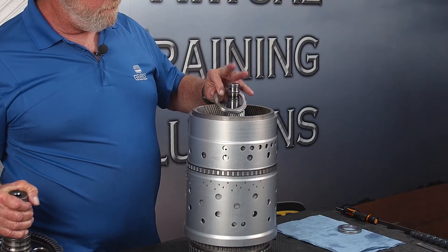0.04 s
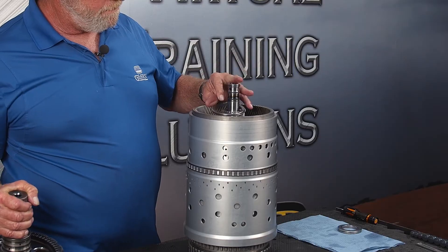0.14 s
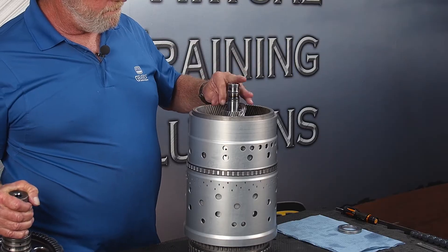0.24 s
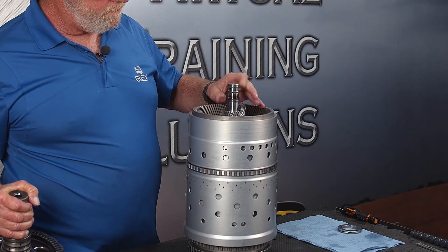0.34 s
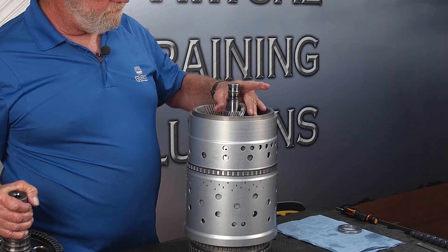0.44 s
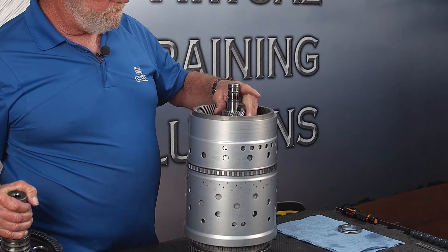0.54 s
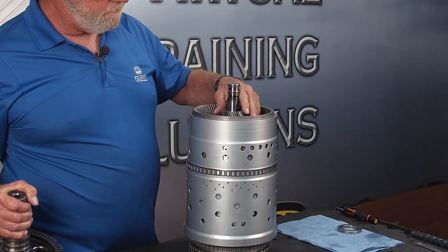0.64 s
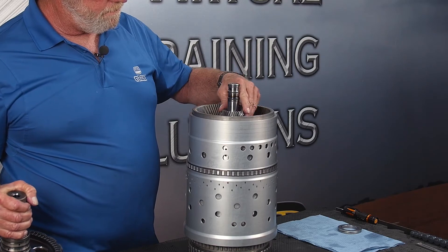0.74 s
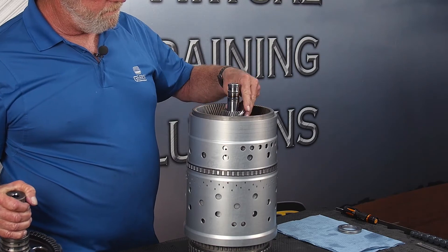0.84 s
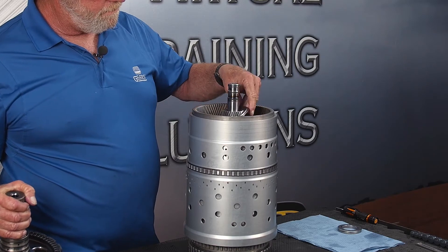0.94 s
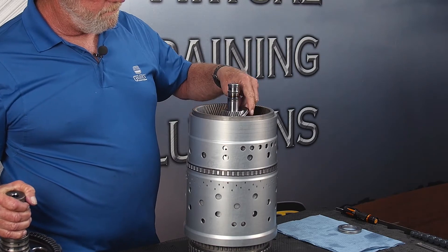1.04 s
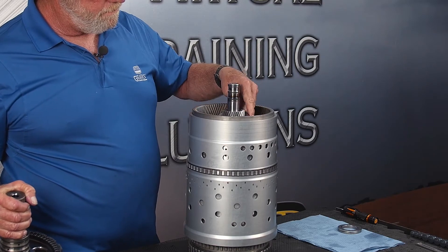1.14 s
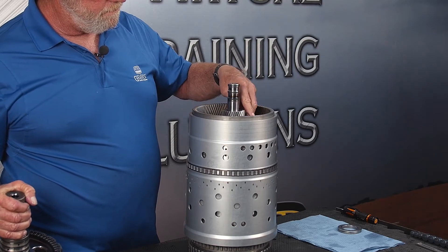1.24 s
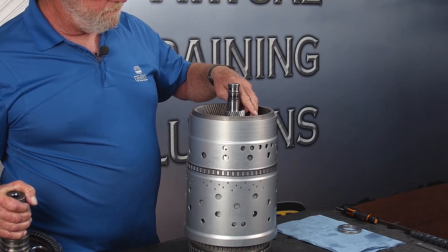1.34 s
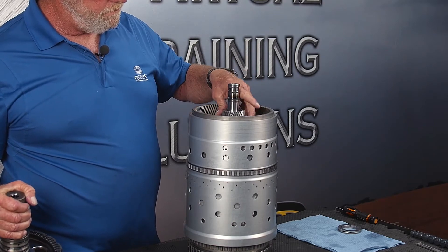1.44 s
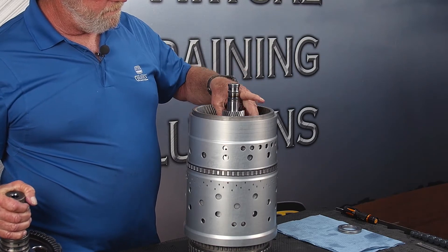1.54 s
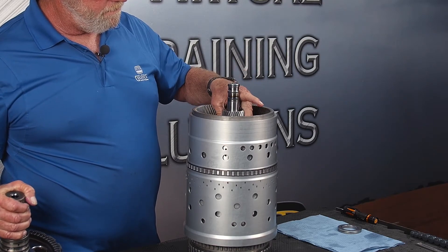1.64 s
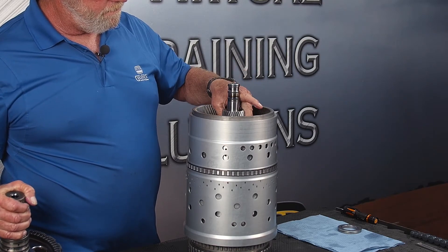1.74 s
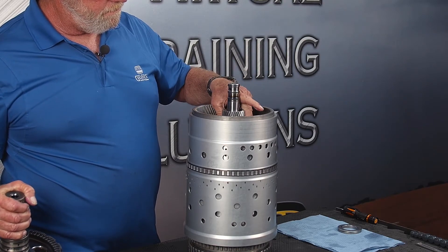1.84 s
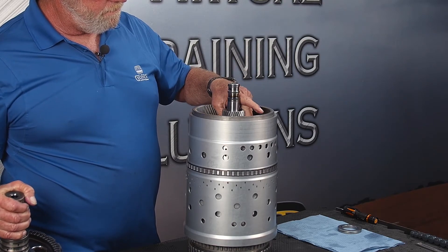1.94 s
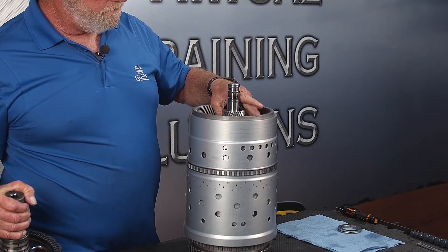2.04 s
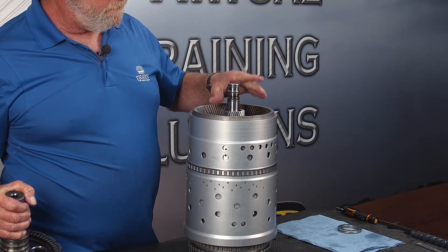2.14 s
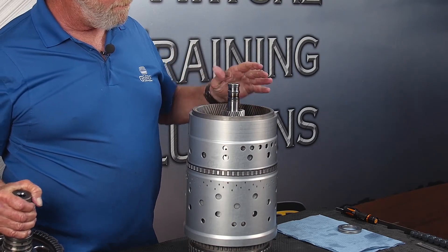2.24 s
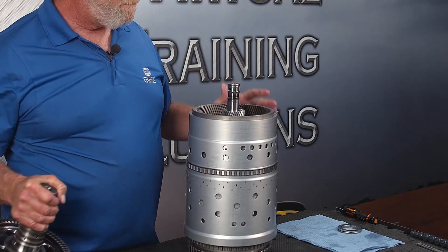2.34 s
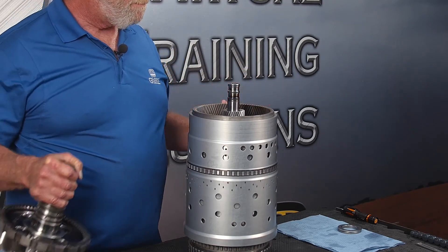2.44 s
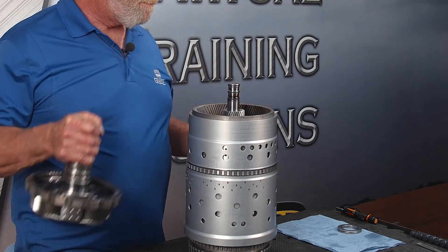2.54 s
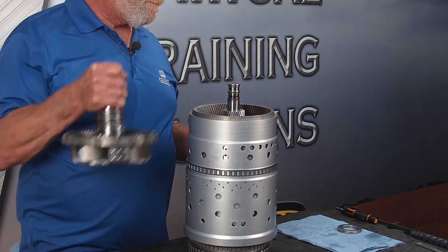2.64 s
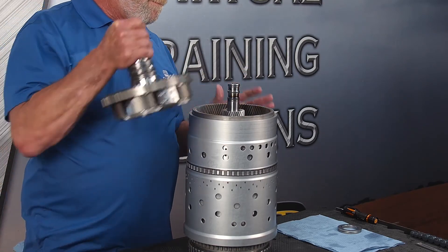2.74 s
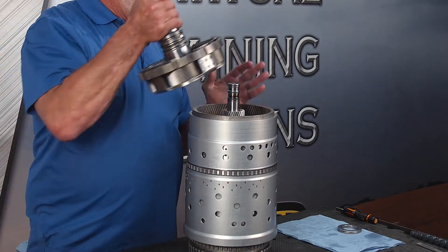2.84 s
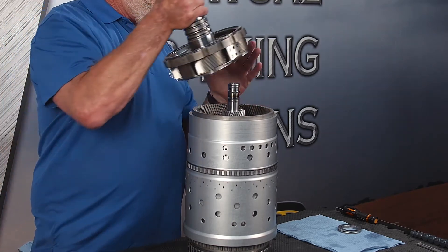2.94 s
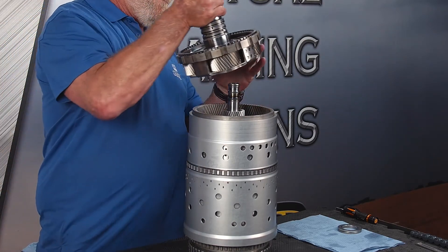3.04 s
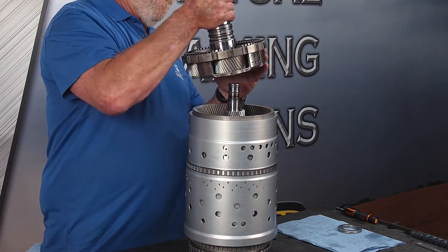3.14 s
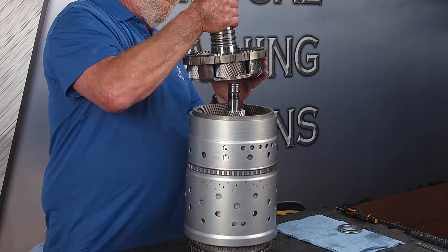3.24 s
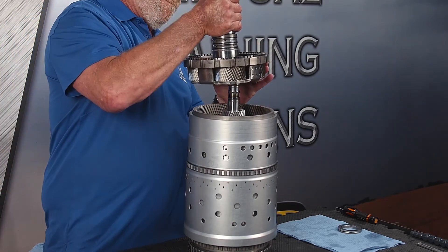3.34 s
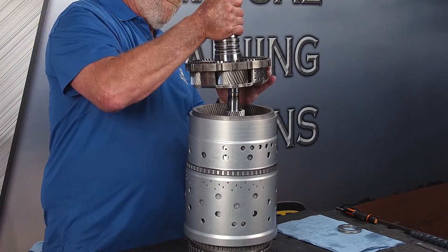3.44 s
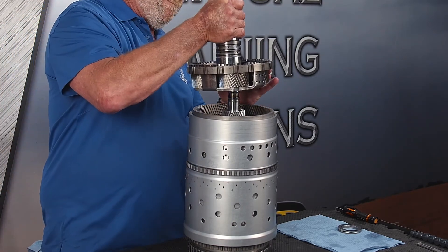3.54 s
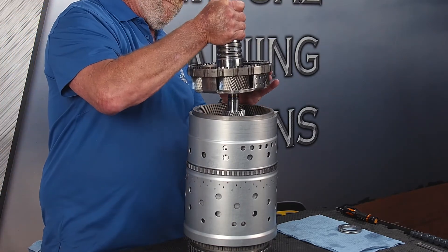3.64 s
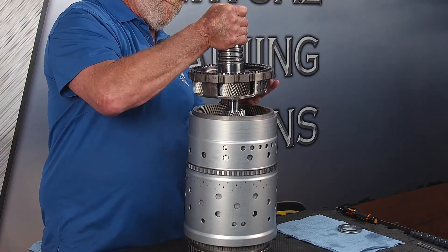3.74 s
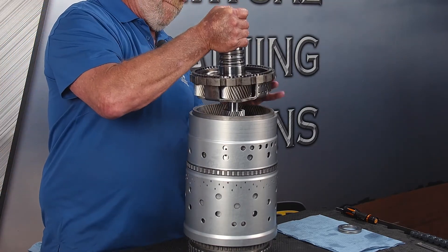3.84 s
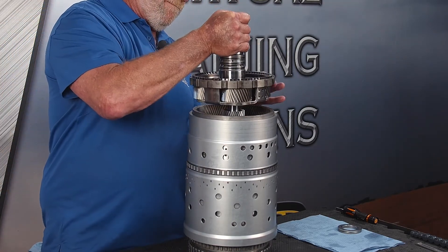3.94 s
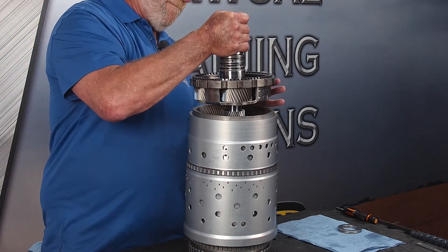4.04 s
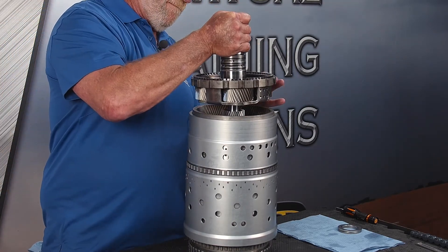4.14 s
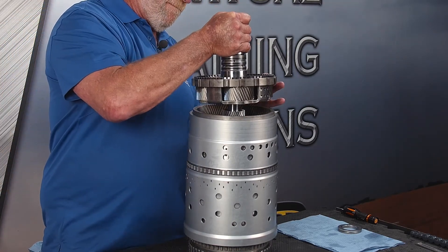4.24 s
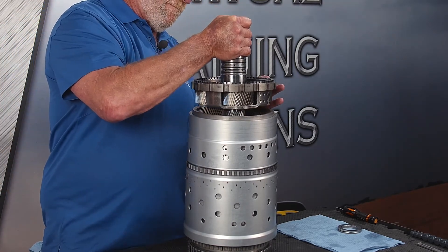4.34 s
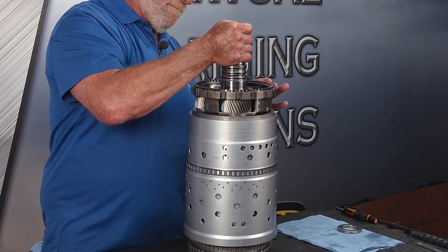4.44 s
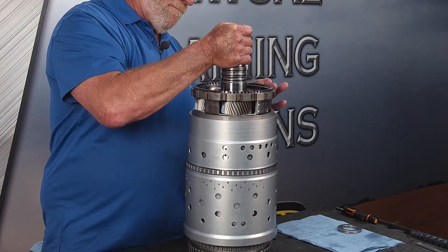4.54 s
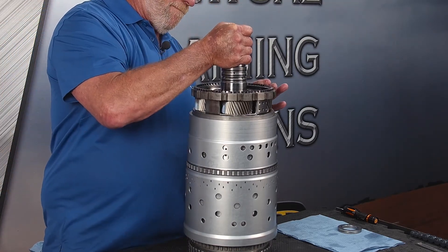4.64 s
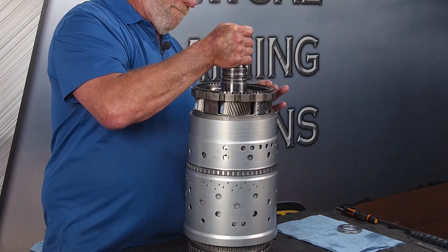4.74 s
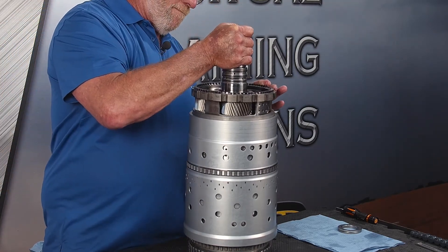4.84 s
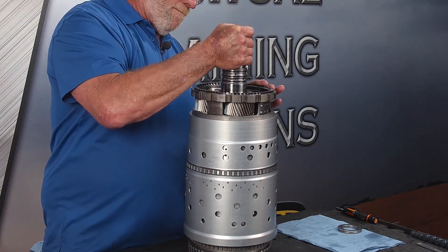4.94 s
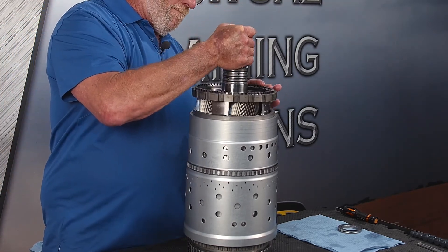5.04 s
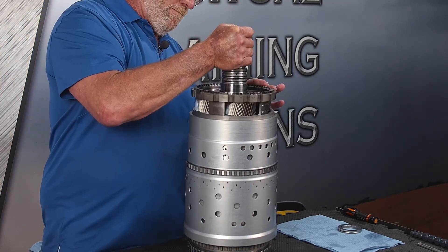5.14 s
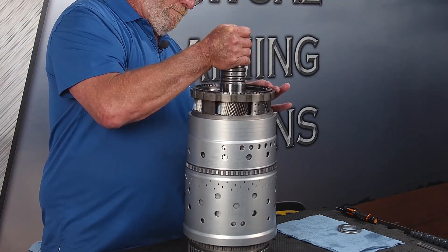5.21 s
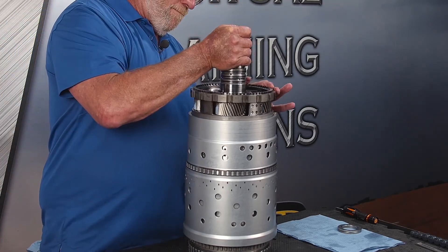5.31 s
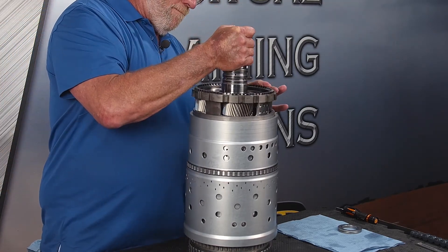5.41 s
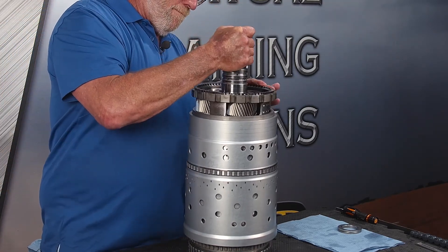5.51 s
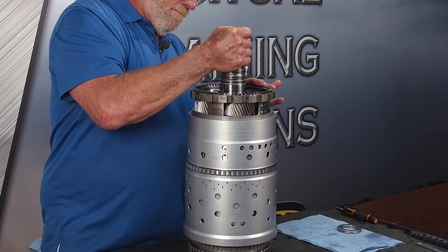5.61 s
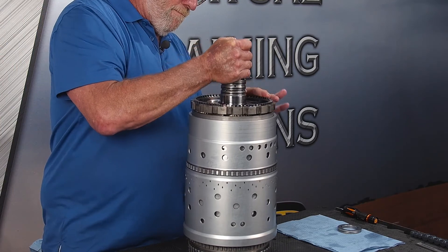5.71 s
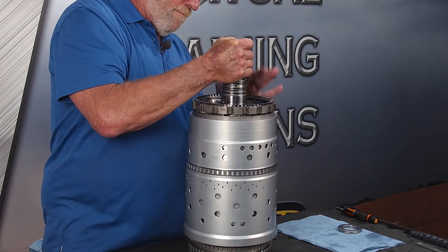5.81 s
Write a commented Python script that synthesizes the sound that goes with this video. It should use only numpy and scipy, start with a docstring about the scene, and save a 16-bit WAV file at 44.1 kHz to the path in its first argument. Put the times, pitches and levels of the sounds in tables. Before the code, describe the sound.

A thin steel washer ticks and scrapes down a shaft, cloth rustles, then a heavy gear carrier knocks, grinds and drops home with a loud clunk.

```python
"""Fitting gearbox parts

Steel gearbox parts go into an upright drum stack on a workshop bench, heard by a lapel microphone.
A thin washer ticks and slides down the shaft: blows and rough friction set noise bands and notes ringing.
A shirt rustles (shaped noise and a gliding whistle) as a heavy gear carrier is lifted over. It knocks
on the shaft, then its teeth rattle and grind into the ring gear until it drops home.
Air, hum and a low rocking lie below; noise that dies away makes the room."""
import sys
import numpy as np
from scipy import signal
from scipy.fft import rfft, irfft
from scipy.io import wavfile

SR = 44100
rng = np.random.default_rng(int(sys.argv[2]) if len(sys.argv) > 2 else 0)


def bounce(signal):
    """Save signal as a 16-bit WAV file at the path given by the first command-line argument."""
    frames = np.transpose(np.atleast_2d(signal))
    limited = np.clip(frames, -1, 1)
    pcm = np.round(limited * 32767).astype(np.int16)
    wavfile.write(sys.argv[1], SR, pcm)


N = 258867

# Levels of blows, notes and bands add up in dB, so each is a strength and not the final loudness.
# Air: (frequency [Hz], level [dB per Hz]), and its overall level [dB]
AIR = [(21, -33), (35, -4), (54, -10), (241, -20), (312, -29.5), (364, -20.5), (425, -39), (472, -28.5),
       (2330, -42), (12100, -46), (16500, -52)]
AIR_DB = -67.5
# Hum of the building: (frequency [Hz], average level [dB])
HUM = [(27, -64.5), (118.4, -84.5), (242, -79.5), (361, -87.5)]

# Small bright ticks: mostly the washer touching shaft and hub, the last two small contacts during
# the carrier's lift: (time [s], strength [dB], hollow part [dB], bright part [dB])
TICKS = [(0.001, -30.5, -10, 0), (0.048, -26, -14, -2), (0.1068, -26.5, -12, -1.5), (0.126, -19, -5.5, -1),
         (0.173, -31.5, -1.5, -3), (0.2188, -36, -3.5, -13.5), (0.2486, -32, -3, -5.5),
         (0.2575, -19.5, -3, 2), (0.271, -38, -0.5, 1), (0.2897, -39, 5, 5.5), (0.307, -47, 0, 5),
         (0.3132, -19, -10.5, -0.5), (0.3392, -40.5, 6.5, 4.5), (0.3648, -44.5, 1, 3),
         (0.378, -42.5, 1, -16), (0.642, -63.5, 0.5, 7), (0.7153, -55, 8, -9), (0.826, -62, -3.5, 1),
         (0.9224, -65, 19, 3), (0.934, -53, 1.5, -2), (0.9522, -39, -6, -12.5), (0.9675, -53, 19.5, -21),
         (1.0141, -40.5, 2, -7), (1.043, -53, 13.5, 8.5), (1.083, -63, 6, -8), (1.142, -52, 2, -9),
         (1.1924, -40, -7, 0), (1.202, -31, -7, 3.5), (1.2427, -38, -18, -32), (1.306, -37, -8, -4),
         (1.3632, -28.5, -25, -21), (1.422, -19.5, -10.5, 1.5), (1.4798, -28, -26, -19),
         (1.4853, -41, -23, 13.5), (1.5172, -38, -30, -25), (1.6873, -38, -10.5, -9),
         (2.0699, -51, -27, -35), (3.3438, -54, -14, -13), (3.3664, -44, -24, -17)]
# Washer scraping along the shaft: (start [s], full [s], fading [s], end [s], level [dB])
# In a few rows here and in SHIRT the times are out of order: those strokes are cut short or jump.
WASHER_SLIDE = [(0.0, .02, 0.14, 0.21, -61.5), (.1, .13, 0.2, 0.23, -57.5), (.24, .27, 0.32, 0.5, -57),
                (.88, .93, 0.97, 1.18, -66), (1.13, 1.19, 1.24, 1.3, -64), (1.27, 1.3, 1.34, 1.5, -63),
                (1.41, 1.43, 1.36, 1.9, -68), (1.64, 1.68, 1.83, 1.67, -66)]
# Long notes of the ticks: (frequency [Hz], level [dB], time to fall 60 dB [s])
TICK_MODES = [(702, -16, 0.045), (1360, -11, 0.07), (3160, -19, .04)]
# Crowded, quickly damped modes of the ticks: (frequency [Hz], level per band [dB], time to fall 60 dB [s])
TICK_CLACK = [(437.7, -14.5, 0.017), (880, 8.5, 0.0032), (1247, 5, 0.041), (2230, -14, 0.019),
              (2660, 1.5, 0.021), (5156, 1, 0.005), (6476, -1, 0.014), (7240, -2.5, 0.0084),
              (8660, 3, 0.02), (15170, -9.5, 0.0079)]
# Hiss of the slide: (frequency [Hz], level [dB per Hz])
SCRAPE = [(1180, -33), (2000, -1), (2170, -11), (2410, -4), (3210, -1.5), (4060, -15.5), (5270, 6),
          (6050, -7), (9240, -10), (14000, -19)]
SCRAPE_DB = -1  # compared with the slide
# Ringing of a -32 dB tick [dB]; softer ticks ring relatively more [dB per dB]
TICK_RING_DB, TICK_RING_SLOPE = -7, -0.061
# Rim singing under a rough, grainy slide: (time [s], level [dB])
RIM_STROKE = [(.46, -72), (.52, -62.5), (.6, -74.5), (.66, -91), (.75, -88), (.8, -77), (.83, -82.5)]
# Notes of the rim: (frequency [Hz], level [dB])
RIM_NOTES = [(3150, -3), (4440, -19.5)]
# Hub singing under a rough, grainy slide: (time [s], level [dB])
HUB_STROKE = [(1.305, -48.5), (1.4, -69), (1.49, -44), (1.64, -98)]
# Notes of the hub: (frequency [Hz], level [dB])
HUB_NOTES = [(1350, 0.5), (1700, -2), (5200, -13)]

# Single dying notes of the metal: faint pings, and the strong low notes of the carrier dropping home:
# (time [s], frequency [Hz], level [dB], time to fall 60 dB [s])
SINGLE_NOTES = [(0.0507, 4750, -50, 0.12), (.316, 3120, -46.5, 0.19), (1.366, 3230, -35, 0.028),
                (4.756, 10920, -57.5, .012), (4.784, 3200, -50, 0.0066), (4.901, 5760, -59, 0.026),
                (5.025, 11500, -53, .008), (5.039, 8500, -49, 0.0074), (5.074, 8600, -57, .008),
                (5.7912, 6375, -14.5, 0.023), (5.791, 2930, -15.5, 0.038), (5.8088, 1765, -0.5, 0.032)]
SWELL_S = 0.0011  # time constant of the rise of a note

# Shirt strokes against the microphone:
# (start [s], full [s], fading [s], end [s], dull rub level [dB], swish level [dB])
SHIRT = [(2.2, 2.29, 2.32, 2.96, -63.5, -72.5), (2.72, 2.89, 2.9, 3.66, -61, -63),
         (3.08, 3.18, 3.1, 3.36, -65.5, -77), (3.35, 3.39, 3.84, 3.344, -51, -89)]
STROKE_DEPTH_DB = 23  # a stroke rises by this much and falls again
# Dull rub of the cloth: (frequency [Hz], level [dB per Hz])
RUB = [(59, -30.5), (100, 2.5), (257, -7), (350, 6.5), (600, -9), (845, -6), (1000, -13), (2500, -38),
       (3250, -62.5), (5500, -120)]
# Swish of the cloth: (frequency [Hz], level [dB per Hz])
SWISH = [(880, -2.5), (1500, -5), (2560, -11.5), (3700, -10.5), (4270, -9.5), (14900, -24), (16000, -28.5)]
# Knit weave singing with the speed of the sleeve: (time [s], frequency [Hz])
WEAVE = [(2.8, 9700), (2.91, 15600), (2.96, 13800), (3.0, 15200), (3.05, 13600), (3.09, 11300),
         (3.17, 10400)]
WEAVE_DB = -89
# Cloth bumping the microphone: (time [s], peak level [dB])
BUMPS = [(3.229, -39), (3.238, -47)]

# Loose pinions whispering while the carrier is swung over: (time [s], level [dB])
PINION_STROKE = [(2.82, -79), (2.9, -74), (3.02, -65), (3.12, -89)]
# Notes of the pinions: (frequency [Hz], level [dB])
PINION_NOTES = [(845, 5.5), (2960, -6), (3870, -9), (4270, -1)]

# Carrier bumping and knocking: (time [s], strength [dB], thud part [dB], bright part [dB])
KNOCKS = [(3.015, -42.5, -4.5, -16), (3.597, -17.5, -12, -2.5), (3.662, -45, 5, 4),
          (3.749, -38.5, -30, -12.5), (4.053, -7, -10.5, -21.5), (4.408, -51, -7.5, -18.5),
          (4.588, -32.5, -2.5, -5), (5.156, -38, 5.5, -29), (5.812, -11.5, -6, 1.5)]
# Long notes of the stack: (frequency [Hz], level [dB], time to fall 60 dB [s])
STACK_MODES = [(132.7, -9, 0.21), (236.1, -8.5, 0.37), (382, -6, 0.04), (547, 3, 0.035), (715, -0.5, 0.051),
               (1120, 5.5, 0.029), (1940, -6.5, 0.054)]
# Crowded, quickly damped modes of the stack: (frequency [Hz], level per band [dB], time to fall 60 dB [s])
STACK_CLACK = [(130.3, -15.5, 0.15), (231, -6.5, 0.39), (490, -3, 0.052), (1040, -5, 0.045),
               (1932, -8.5, 0.12), (3000, 2, 0.025), (5130, -2, 0.011), (7850, -16, 0.082),
               (15800, -22, 0.016)]
# An edge touches just before the weight lands
KNOCK_RING_DB, FIRST_TOUCH_S, FIRST_TOUCH_DB = -6, 0.004796, -7.5

# Shoves that set the stack rocking: (time [s], level [dB])
SHOVES = [(3.6, -50), (4.05, -46), (4.579, -47.5), (5.25, -49.5), (5.76, -43), (5.83, -35.5)]
# Low tones of the rocking: (frequency [Hz], level [dB])
ROCKING = [(29, -4), (54, -3), (80, -9)]
ROCK_RISE_S, ROCK_T60_S = 0.012, 1.28  # rise, and time to fall 60 dB

# Shaft singing softly under friction: (time [s], level [dB])
SHAFT_STROKE = [(4.08, -52), (4.2, -66.5), (4.33, -69), (4.46, -70.5)]
# Notes of the shaft: (frequency [Hz], level [dB])
SHAFT_NOTES = [(931, -11.5), (1390, -5), (2910, -17)]

# Tooth on tooth: (time [s], strength [dB], bright part [dB], ringing [dB])
MESHING = [ (4.569, -23.5, -21.5, -23), (4.587, -28.5, -36, -22.5), (4.619, -49.5, -37, 0.5),
           (4.68, -41.5, -37, -3), (4.69, -50.5, -15, -5.5), (4.811, -60.5, -15, -4),
           (4.826, -44, -21, -3.5), (4.926, -47.5, -5, -12), (4.946, -32, -30, -7.5), (4.973, -48, -26, -7),
           (5.052, -56.5, -15, -3), (5.088, -37.5, -9, -5.5), (5.128, -19.5, -11.5, -6),
           (5.159, -31.5, -48, 3), (5.177, -14.5, -22, 1.5), (5.207, -31, -13, -6), (5.221, -18, -26, -1.5),
           (5.231, -12.5, -25, -6), (5.248, -8.5, -10.5, -30), (5.257, -22.5, -18, 3.5),
           (5.27, -18, -20, -23), (5.283, -25.5, -18, 4.5), (5.302, -22, -37, -24),
           (5.319, -11, -11.5, 1.5), (5.349, -19, 0, -30), (5.365, -38, -36, -15), (5.398, -22.5, -46, 2),
           (5.417, -17.5, -7.5, -3), (5.447, -19.5, -13, 1), (5.456, -14.5, -14, -12),
           (5.478, -15, -20, -14), (5.494, -12.5, -14.5, -6.5), (5.510, -13, -8, -5),
           (5.524, -11, -13.5, -11), (5.535, -9, -21, -23), (5.562, -8.5, -13.5, -1.5),
           (5.593, -13.5, -23, -17), (5.612, -18.5, -16, -0.5), (5.636, -43, 4, 0), (5.665, -15, -23.5, 0),
           (5.689, -20.5, -9, -8.5), (5.707, -25.5, -14, -26), (5.738, -19, -29, -17),
           (5.758, -8.5, -21, -3), (5.767, -23, -11, -3), (5.794, -23.5, 7, -22), (5.807, 6, -9.5, -23)]
# Teeth rubbing: (time [s], level [dB])
GEAR_GRIND = [(4.93, -57.5), (5.05, -67), (5.2, -42.5), (5.304, -35.5), (5.384, -42), (5.6, -41.5),
              (5.87, -42.5)]
# Long notes of the gears: (frequency [Hz], level [dB], time to fall 60 dB [s])
GEAR_MODES = [(858, -3.5, 0.035), (1191, -2, 0.07), (1983, -13, 0.21), (3197, -2, 0.086), (3266, -1, 0.078),
              (2590, -18, 0.077), (4710, -19.5, 0.1), (5840, -12, 0.087), (7480, -13, 0.14),
              (9400, -16, 0.072), (11400, -34, 0.075)]
# Crowded, quickly damped modes of the gears: (frequency [Hz], level per band [dB], time to fall 60 dB [s])
GEAR_CLACK = [(250.6, -13.5, 0.079), (568, 0.5, 0.018), (1200, 0, 0.08), (1570, 2, 0.017),
              (1960, -8.5, 0.078), (3020, -1, 0.0097), (4780, -5.5, 0.054), (7900, -8.5, 0.039),
              (14900, -21.5, 0.01)]
# Low part of a -31 dB touch [dB]; softer touches are duller [dB per dB]
TOOTH_LOW_DB, TOOTH_LOW_SLOPE = -0.5, -0.61
# Loose contacts between the teeth: how many, level above the rubbing, and its spread
CHATTER_PER_S, CHATTER_DB, CHATTER_SPREAD_DB = 90, 9, 3.5
PRESSED_DB_PER_S = 696  # extra damping of the gears when rubbing at -40 dB

# Dying away of the room: (frequency [Hz], time to fall 60 dB [s])
ROOM_T60 = [(100, 1), (400, 0.41), (1500, 0.22), (5000, 0.2), (14000, 0.19)]
ROOM_DB = -14
CUTOFF_HZ = 16900


def from_db(db):
    """Gain of a level."""
    return 10 ** (np.asarray(db) / 20)


def rms_one(x):
    """Scale a sound to an average (rms) level of 1."""
    return x / np.sqrt(np.mean(x ** 2) + 1e-20)


def in_time(rows, column=1):
    """Read one column of a curve at every sample."""
    rows = np.array(rows)
    return np.interp(np.arange(N) / SR, rows[:, 0], rows[:, column])


def gain_in_time(rows, column=1):
    """Turn a level curve into gain, with short fades to silence at both ends."""
    t = np.arange(N) / SR
    inside_s = np.minimum(t - rows[0][0], rows[-1][0] - t)
    edges = np.clip(inside_s / .03 + .3, 0, 1)
    return from_db(in_time(rows, column)) * edges


def stroked(strokes, column):
    """Add up strokes that swell, hold and fade."""
    shape_db = STROKE_DEPTH_DB * np.array([1, 0, 0, 1])
    return sum(gain_in_time(list(zip(row[:4], row[column] - shape_db))) for row in strokes)


def at_hz(points, hz, column=1):
    """Read a table at a pitch, with pitch spaced as the ear hears it (log frequency)."""
    points = np.array(points)
    return np.interp(np.log(hz), np.log(points[:, 0]), points[:, column])


def coloured(spectrum):
    """Make noise of unit rms with the given spectrum and nothing outside it."""
    hz = np.arange(1, N // 2 + 2) * SR / N
    inside = (hz > spectrum[0][0]) & (hz < spectrum[-1][0])
    white = rfft(rng.standard_normal(N))
    return rms_one(irfft(white * from_db(at_hz(spectrum, hz)) * inside, N))


def flicker(rate, depth_db):
    """A gain that wanders at random: smoothed noise used as a level in dB."""
    r = np.exp(-2 * np.pi * rate / SR)
    wander = signal.lfilter([1], [1, -2 * r, r * r], rng.standard_normal(N))
    return from_db(depth_db * rms_one(wander))


def wavering(lines, rate, depth_db):
    """Low tones whose strength wanders."""
    t = np.arange(N) / SR
    # a sine peaks 3 dB above its rms
    return sum(from_db(db + 3) * flicker(rate, depth_db) * np.sin(2 * np.pi * hz * t) for hz, db in lines)


def ring(force, hz, t60):
    """A resonance: a unit click sets a dying sine of starting height 1 ringing."""
    r = from_db(-60 / (max(t60, .002) * SR))
    w = 2 * np.pi * hz / SR
    return signal.lfilter([0, np.sin(w)], [1, -2 * r * np.cos(w), r * r], force + 1e-18)


def note(age, hz, db):
    """A sine that swells in quickly."""
    return from_db(db) * (1 - np.exp(-age / SWELL_S)) * np.sin(2 * np.pi * hz * age)


def rubbed(gain, per_s, size_db, grain_s):
    """Rough metal on metal: dense uneven catches, each a short pulse of force."""
    catches = rng.random(N) < per_s / SR
    size = from_db(size_db * np.minimum(rng.exponential(1, N), 4))
    pulses = signal.lfilter([1], [1, -np.exp(-1 / (grain_s * SR))], catches * size)
    return gain * rms_one(pulses)


def singing(stroke, notes, t60, catches_per_s):
    """Friction, a rain of small catches, keeps a few modes sounding, each wavering on its own."""
    force = rubbed(1, catches_per_s, size_db=2.5, grain_s=0.00047)
    tones = sum(from_db(db) * rms_one(ring(force * rng.standard_normal(N), hz, t60)) for hz, db in notes)
    return gain_in_time(stroke) * tones


def tilt_db(blows, parts_hz, hz):
    """Level of each blow at one pitch: its colour columns rule below and above the middle."""
    low = np.interp(np.log(hz), np.log(parts_hz), [0.94, 0.00072, 0.0045])
    high = np.interp(np.log(hz), np.log(parts_hz), [0.06, 0.045, 0.82])
    return blows[:, 1] + low * blows[:, 2] + high * blows[:, 3]


def struck(blows, modes, parts_hz, rubbing, spread_db):
    """Blows, and rubbing as a rain of small ones, set long modes ringing, each with its own strength."""
    blows, out = np.array(blows), np.zeros(N)
    at = (blows[:, 0] * SR).astype(int)
    for hz, level_db, t60 in modes:
        force = rubbing * rng.standard_normal(N)
        db = tilt_db(blows, parts_hz, hz) + blows[:, 4] + rng.normal(0, spread_db, len(at))
        np.add.at(force, at, from_db(db) * rng.choice([-1, 1], len(at)))
        softened = signal.lfilter([.5], [1, -.5], force)
        out += from_db(level_db) * ring(softened, hz, t60)
    return out


def clack(blows, body, parts_hz, rubbing, contact_s, snap_db, snap_s, spread_db):
    """Third-octave noise bands snap at each blow, then die at the body's rate; rubbing keeps them alive."""
    blows, out, white = np.array(blows), np.zeros(N), rng.standard_normal((2, N))
    at = (blows[:, 0] * SR).astype(int)
    rise = np.exp(-1 / (contact_s * SR))
    octaves = np.log2(body[-1][0] / body[0][0])
    for k, hz in enumerate(body[0][0] * 2 ** np.arange(0, octaves + .1, 1 / 3)):
        force = np.full(N, 1e-18)
        np.add.at(force, at, from_db(tilt_db(blows, parts_hz, hz) + rng.normal(0, spread_db, len(at))))
        t60 = max(at_hz(body, hz, column=2), .004)
        fall = from_db(-60 / (t60 * SR))
        dying = signal.lfilter([1], [1, -fall], force)
        snap = from_db(snap_db) * signal.lfilter([1], [1, -np.exp(-1 / (snap_s * SR))], force)
        flare = signal.lfilter([1 - rise], [1, -rise], dying + snap) + rubbing
        sos = signal.butter(2, [hz * .89, min(hz * 1.12, 19000)], "band", fs=SR, output="sos")
        band = signal.sosfilt(sos, flare * white[k % 2])
        # narrow low bands catch less noise, so they are raised
        out += from_db(at_hz(body, hz)) * np.sqrt(SR / hz / 10) * band
    return out


def background():
    """Air as shaped noise, and the hum of the building as wavering low tones."""
    return from_db(AIR_DB) * coloured(AIR) + wavering(HUM, 3.1, 0.95)


def ticks_and_slide():
    """Bright short ticks with a hollow note from the drum, and the washer's slide with singing rim and hub."""
    slide = rubbed(stroked(WASHER_SLIDE, column=4), per_s=430, size_db=1.5, grain_s=0.0026)
    parts_hz = [1200, 3500, 9000]
    ticks = [(s, db, hollow, bright, TICK_RING_DB + TICK_RING_SLOPE * (db + 32.0))
             for s, db, hollow, bright in TICKS]
    out = clack(ticks, TICK_CLACK, parts_hz, slide * from_db(-0.5),
                contact_s=0.00017, snap_db=-0.5, snap_s=0.00073, spread_db=3.5)
    out += struck(ticks, TICK_MODES, parts_hz, slide * from_db(-30), spread_db=7.0)
    out += from_db(SCRAPE_DB) * slide * coloured(SCRAPE)
    out += singing(RIM_STROKE, RIM_NOTES, t60=0.13, catches_per_s=740)
    return out + singing(HUB_STROKE, HUB_NOTES, t60=0.01804, catches_per_s=530)


def single_notes():
    """Single dying notes of the metal: faint pings, and strong low ones as the carrier drops home."""
    out = np.zeros(N)
    for s, hz, db, t60 in SINGLE_NOTES:
        age = np.maximum(np.arange(N) / SR - s, 0)
        out += note(age, hz, db - 60 * age / t60)
    return out


def shirt():
    """Cloth rub and swish as flickering noise, the thin whistle of the weave and two soft bumps."""
    out = stroked(SHIRT, column=4) * coloured(RUB) * flicker(24, 2.2)
    out += stroked(SHIRT, column=5) * coloured(SWISH) * flicker(26, 1.1)
    whistle = gain_in_time([(WEAVE[0][0], WEAVE_DB), (WEAVE[-1][0], WEAVE_DB)])
    phase = 2 * np.pi * np.cumsum(in_time(WEAVE)) / SR
    out += whistle * flicker(66, 3.2) * np.sin(phase)
    for s, db in BUMPS:
        out += from_db(db) * np.exp(-((np.arange(N) / SR - s) / 0.0012) ** 2)
    return out


def pinions():
    """Loose pinions whisper: friction keeps their notes sounding softly."""
    return singing(PINION_STROKE, PINION_NOTES, t60=0.019, catches_per_s=1400)


def carrier_knocks(grind):
    """Heavy knocks shake the whole stack, and the grinding teeth keep its long notes alive."""
    stack_hz = [267, 630, 1400]
    knocks = [(s - early, db + loss_db, thud, bright, KNOCK_RING_DB) for s, db, thud, bright in KNOCKS
              for early, loss_db in ((0, 0), (FIRST_TOUCH_S, FIRST_TOUCH_DB))]
    out = clack(knocks, STACK_CLACK, stack_hz, 0,
                contact_s=0.00035, snap_db=-8.5, snap_s=0.00048, spread_db=5.5)
    return out + struck(knocks, STACK_MODES, stack_hz, grind * from_db(-27.0), spread_db=4.5)


def rocking():
    """Each shove sets the stack rocking: low wavering tones that rise fast and die slowly."""
    t = np.arange(N) / SR
    sway = np.zeros(N)
    for s, db in SHOVES:
        dying_db = db - 60 * np.maximum(t - s, 0) / ROCK_T60_S
        sway += np.clip((t - s) / ROCK_RISE_S, 0, 1) * from_db(dying_db)
    return sway * wavering(ROCKING, 2.3, 5.0)


def shaft():
    """The shaft sings softly: friction keeps its notes sounding."""
    return singing(SHAFT_STROKE, SHAFT_NOTES, t60=0.094, catches_per_s=3700)


def chatter():
    """Small uneven contacts that follow the strength of the rubbing, some dull and some bright."""
    when = np.flatnonzero(rng.random(N) < CHATTER_PER_S / SR)
    when = when[when > GEAR_GRIND[0][0] * SR]
    size, low, bright = rng.standard_normal((3, N))[:, when]
    db = in_time(GEAR_GRIND)[when] + CHATTER_DB + CHATTER_SPREAD_DB * size
    return list(zip(when / SR, db, -6 + 2.7 * low, -9 + 6.5 * bright, 0 * db))


def stopped(blows, modes, parts_hz, spread_db):
    """Each touch stops the ringing before it and starts its own; teeth pressed together damp it."""
    blows, out, n = np.array(blows), np.zeros(N), np.arange(N)
    at = (blows[:, 0] * SR).astype(int)
    last = np.maximum(np.searchsorted(at, n, side="right") - 1, 0)  # the latest touch at each sample
    pressed = PRESSED_DB_PER_S * (gain_in_time(GEAR_GRIND)[at[last]] * 100) ** .5
    age = np.maximum(n - at[last], 0) / SR
    for hz, level_db, t60 in modes:
        db = level_db + tilt_db(blows, parts_hz, hz) + blows[:, 4] + rng.normal(0, spread_db, len(at))
        out += note(age, hz, db[last] - (60 / t60 + pressed) * age)
    return out


def gear_teeth(grind):
    """Teeth clack and chatter as noise bands; touches and grinding ring the gears."""
    gear_hz = [1020, 2660, 7200]
    teeth = [(s, db, TOOTH_LOW_DB + TOOTH_LOW_SLOPE * (db + 31), bright, ringing)
             for s, db, bright, ringing in MESHING]
    out = clack(teeth + chatter(), GEAR_CLACK, gear_hz, grind * from_db(-27.0),
                contact_s=0.0007, snap_db=5.5, snap_s=0.00068, spread_db=3.5)
    out += stopped(teeth, GEAR_MODES, gear_hz, spread_db=6.0)
    for hz, db, t60 in GEAR_MODES:
        out += from_db(db - 31) * ring(grind * rng.standard_normal(N), hz, t60)
    return out


def room(x):
    """Diffuse reflections: octave bands of noise, each dying at its own rate."""
    t = np.arange(SR // 2) / SR
    tail = np.zeros(len(t))
    for low in 70 * 2. ** np.arange(8):
        sos = signal.butter(2, [low, 2 * low], "band", fs=SR, output="sos")
        band = signal.sosfilt(sos, rng.standard_normal(len(t)))
        tail += band * from_db(-60 * t / at_hz(ROOM_T60, 1.88 * low))
    tail *= np.clip(t / 0.0062, 0, 1)  # the reflections build up over the first few ms
    return signal.fftconvolve(x, tail / np.sqrt(np.sum(tail ** 2)))[:N]


def scene():
    """Metal parts in the room, with cloth, background and rocking close to the microphone."""
    metal = ticks_and_slide()
    grind = rubbed(gain_in_time(GEAR_GRIND), per_s=350, size_db=9.0, grain_s=0.0087)
    metal += carrier_knocks(grind) + gear_teeth(grind) + pinions() + shaft() + single_notes()
    in_room = metal + from_db(ROOM_DB) * room(metal)
    return (in_room + shirt() + background() + rocking())[None]


def record(dry):
    """Loud peaks are rounded off, then the top of the treble is cut."""
    rounded = np.tanh(dry * 1.05) / 1.05
    return signal.sosfilt(signal.cheby2(16, 90, CUTOFF_HZ, fs=SR, output="sos"), rounded)


dry = scene()
out = record(dry)
bounce(out)
```